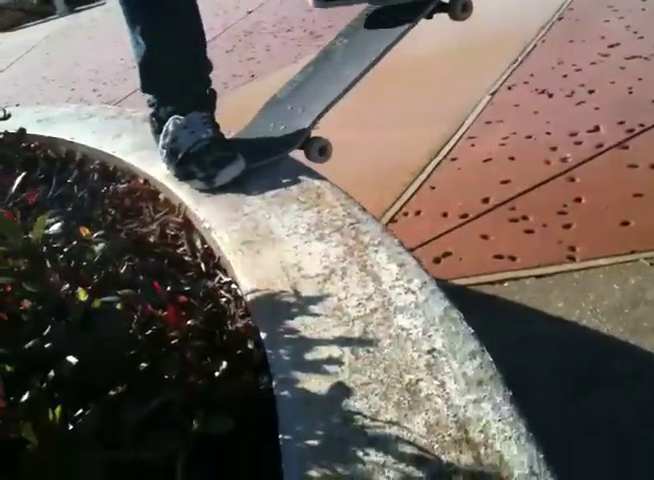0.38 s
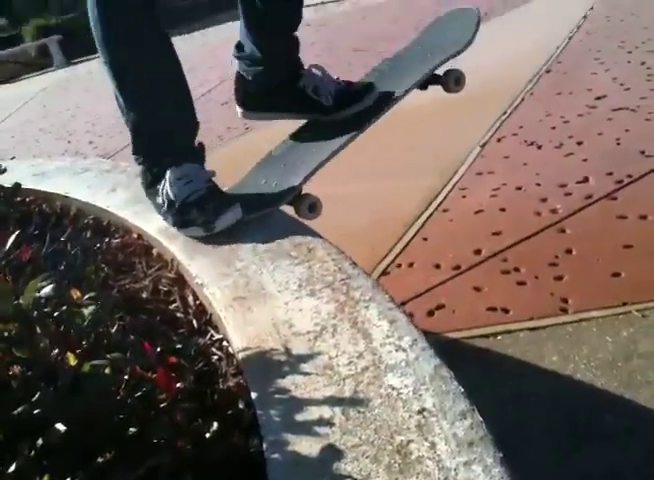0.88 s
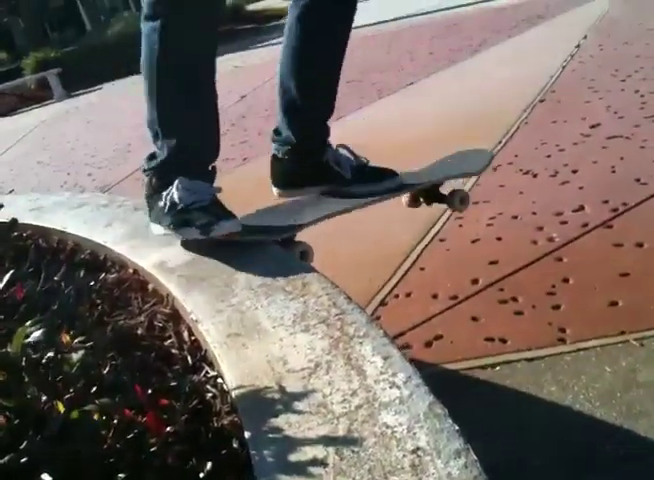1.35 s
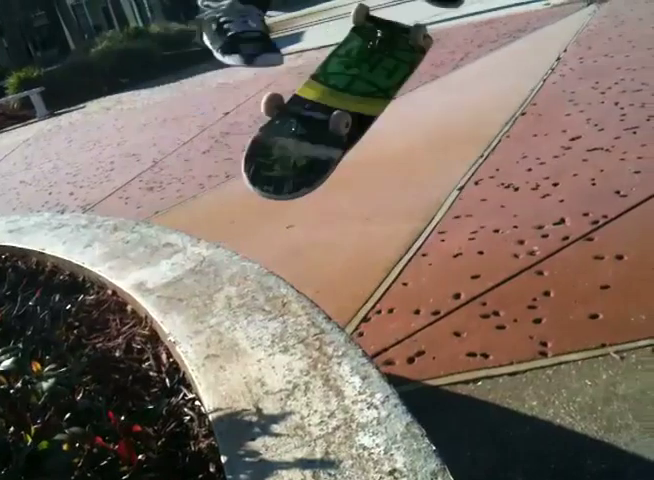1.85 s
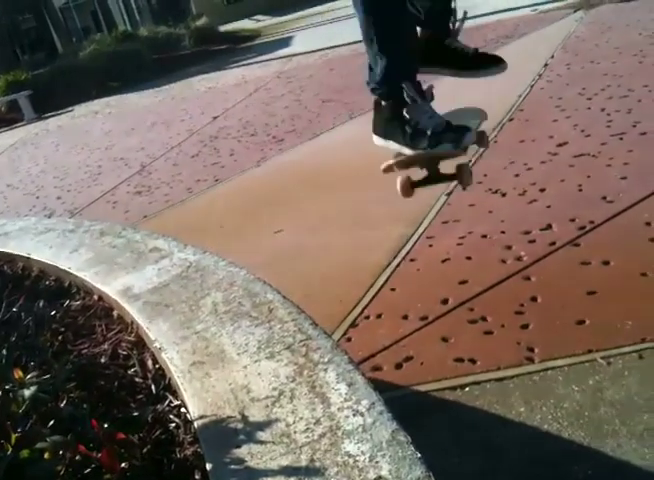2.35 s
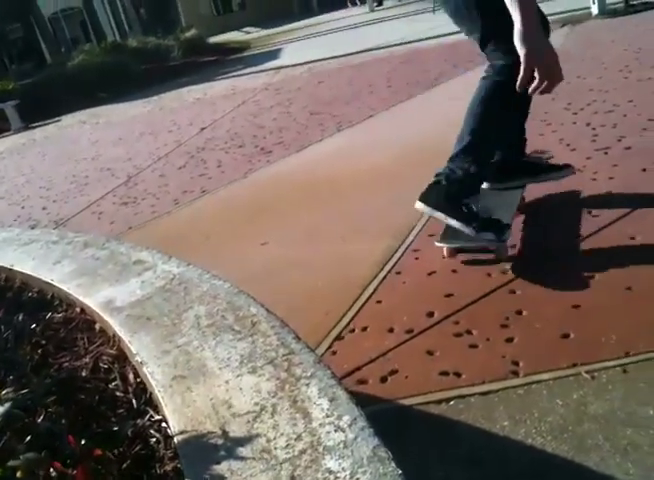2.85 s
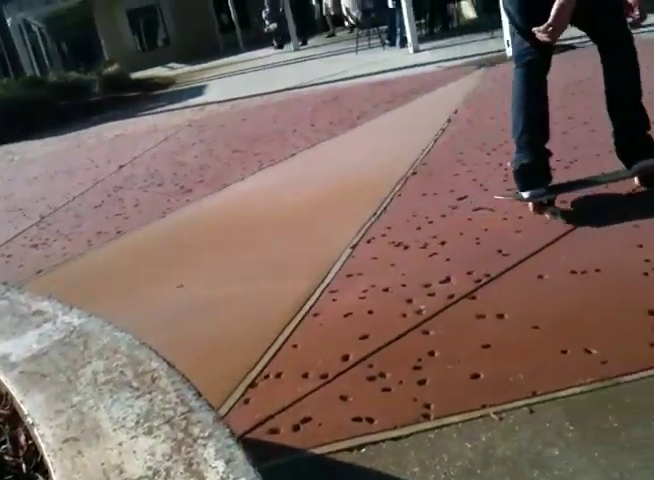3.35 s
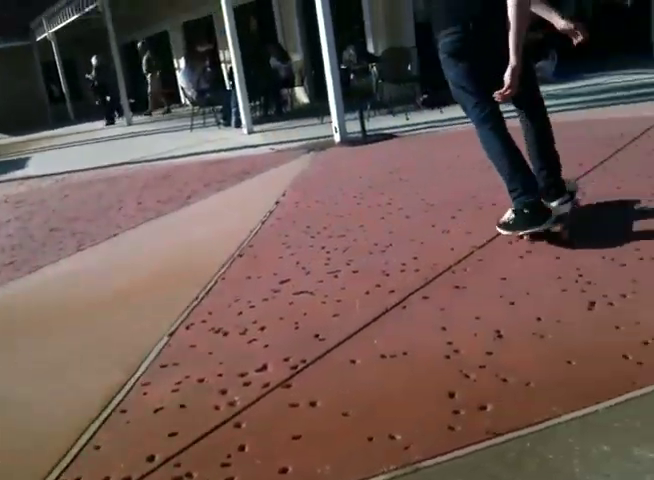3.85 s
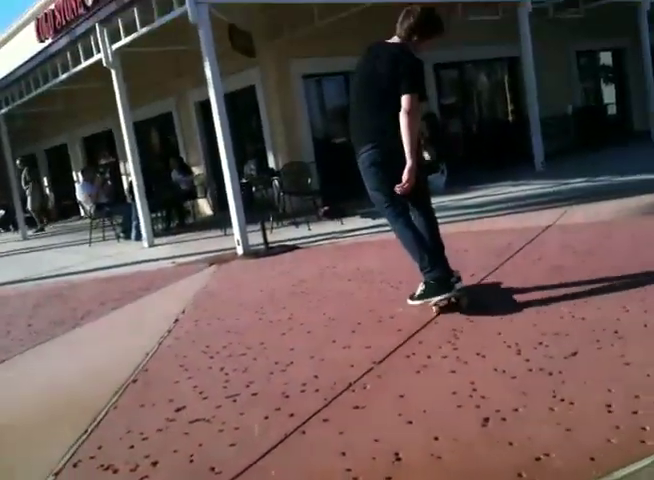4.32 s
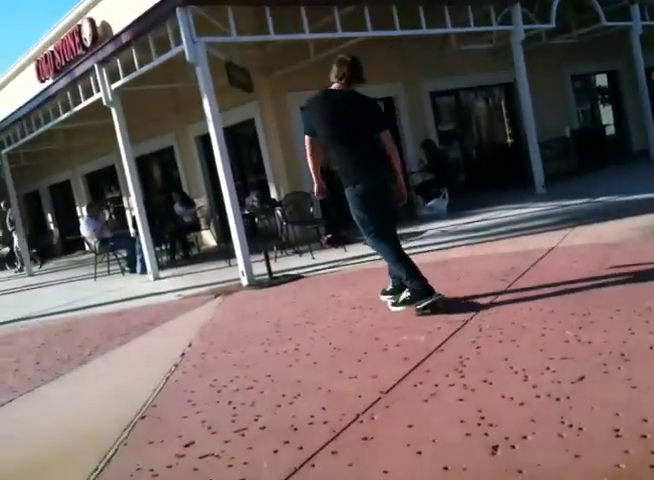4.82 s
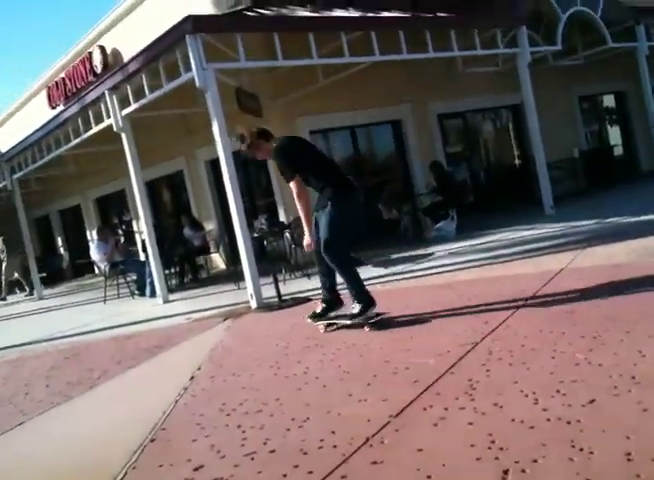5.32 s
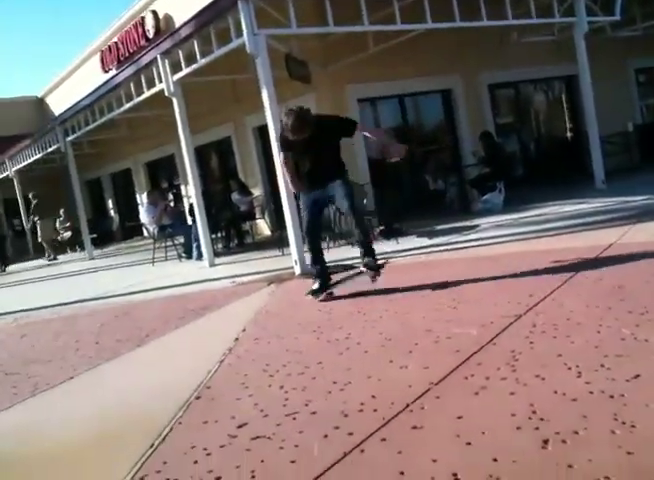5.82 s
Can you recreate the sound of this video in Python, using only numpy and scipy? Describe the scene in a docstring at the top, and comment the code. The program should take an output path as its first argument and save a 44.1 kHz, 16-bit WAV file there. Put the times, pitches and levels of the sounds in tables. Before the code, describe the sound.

A skateboard tail smacks a concrete kerb, followed by faint shoe and grit shuffles. The pop and flip play at half speed, low, dull and scraping, with quiet flight. A very loud double landing overloads the small phone microphone, then a quick clattering burst follows. Wheels tick and rumble away across an open plaza while gusts thump the microphone.

```python
"""Open paved plaza with a concrete kerb: a skateboard tail is stamped, popped into a flip, landed hard, rolled away.
Blows and scrapes drive deck, truck and tape resonators and coloured noise; a noise tail echoes them.
Noise through the deck modes rumbles, faintly in flight; grit hisses on the ground; wheels clack over joints.
Wind is lumpy filtered noise plus short decaying sines. A small phone microphone overloads on the landing.
The flight plays at half speed, an octave lower."""
import sys
import numpy as np
from scipy import signal
from scipy.fft import rfft, irfft
from scipy.io import wavfile
from scipy.ndimage import uniform_filter1d

SR = 44100
rng = np.random.default_rng(int(sys.argv[2]) if len(sys.argv) > 2 else 0)


def ratio(d):
    """dB to gain"""
    e = np.asarray(d, float) / 20
    return 10 ** e


def log_audio(samples):
    """Write samples as a 16-bit WAV file to the path given in sys.argv[1]."""
    # one column per channel
    frames = np.atleast_2d(samples).T
    # limit to full scale, then quantise
    limited = np.clip(frames, -1, 1)
    pcm = np.round(limited * 32767).astype(np.int16)
    wavfile.write(sys.argv[1], SR, pcm)


N = 261954

# All t/s are as played, slow part included. Levels are nominal, ahead of the microphone.
# far plaza noise with microphone hiss: f/Hz, relative density/dB
PLAZA_SPECTRUM = [(30, -14.5), (120, 12), (400, -18), (1160, -11.5), (2230, -23.5), (3310, -20),
                  (4780, -25), (6720, -26.5), (15000, -44)]
# breeze at the microphone port between gusts: t/s, level/dB
BREEZE_LEVEL = [(0, -55.5), (1.6, -53), (2.3, -57.5), (2.8, -46.5), (3.4, -33), (3.9, -41.5), (4.5, -47),
                (5.1, -49), (5.94, -56)]
# gusts: peak t/s, rise/s, fall/s, level/dB; rise and fall each span GUST_SPAN_DB, 0.01 s at least
WIND_GUSTS = [(.036, .025, 0.066, -39), (.17, 0.12, 0.097, -44), (.356, 0.05, 0.014, -42.5),
              (.416, 0.023, .09, -43), (.616, 0.05, 0.058, -33), (.836, 0.14, 0.023, -41.5),
              (.96, 0.073, 0.046, -37.5), (1.046, 0.046, .05, -46), (1.266, 0.14, 0.3, -40.5),
              (1.468, 0.089, .04, -42.5), (1.574, .1, 0.054, -40), (2.032, .07, .03, -50),
              (2.13, .025, 0.017, -46), (2.729, .09, 0.11, -35), (2.971, 0.15, 0.17, -23.5),
              (3.3, 0.25, 0.058, -22), (3.492, 0.11, 0.36, -20), (3.62, .1, 0.063, -19.5),
              (3.74, .07, 0.049, -22), (3.819, .03, 0.028, -20.5), (3.99, .15, 0.43, -33),
              (4.16, 0.03, 0.034, -29), (4.25, 0.11, .12, -21), (4.35, 0.072, 0.25, -24.5),
              (4.64, 0.063, 0.075, -30.5), (4.85, 0.27, .05, -43), (5.19, 0.028, 0.091, -37.5),
              (5.308, 0.048, 0.018, -35), (5.43, 0.066, 0.1, -34.5), (5.57, 0.12, 0.19, -30),
              (5.811, 0.17, 0.019, -38), (5.871, 0.014, 0.086, -37.5)]
# single buffets of wind: t/s, level/dB, settled pitch f/Hz
WIND_BUFFETS = [(0.605, -20, 178), (1.036, -32, 156), (2.866, -22, 166), (2.931, -18, 243),
                (2.961, -17.5, 214), (3.019, -16, 167), (3.254, -15.5, 224), (3.288, -20, 364),
                (3.464, -12.5, 228), (3.508, -9.5, 191), (3.557, -10, 255), (3.625, -18, 161),
                (3.672, -16.5, 354), (3.738, -28, 212), (3.821, -9, 235), (3.995, -24, 260),
                (4.147, -23, 205), (4.244, -18, 184), (4.266, -19, 230), (4.864, -20.5, 174),
                (5.194, -28, 240), (5.536, -25, 190), (5.566, -19, 160), (5.611, -24.5, 198),
                (5.81, -28.5, 169), (5.862, -32, 181)]
# level of the low rumble, faint during the flight: t/s, level/dB
RUMBLE_LEVEL = [(0, -38.5), (.11, -66), (.28, -55.5), (1.45, -57.5), (1.69, -52), (1.9, -57), (2.4, -59),
                (2.58, -41), (2.73, -27), (2.88, -52), (3.2, -47), (3.6, -51.5), (3.8, -39.5), (4.0, -50.5),
                (4.57, -46), (5.03, -52.5), (5.4, -44.5), (5.66, -54.5), (5.94, -57.5)]
# grit and crack: f/Hz, relative density/dB
GRIT_SPECTRUM = [(500, 1), (1500, -1), (2300, 2.5), (3600, 1.5), (5200, -7), (7500, -4), (9000, -8),
                 (15000, -19)]
# plywood deck and axles, low modes: f/Hz, width/Hz, level/dB
DECK_LOW_MODES = [(667, 117, 1), (1071, 170, -0.5), (1320, 81, -4)]
# plywood deck and axles, high modes: f/Hz, width/Hz, level/dB
DECK_HIGH_MODES = [(1538, 386, 0.61), (1850, 330, 1.2), (2170, 116, -1.2)]
# deepest deck modes: f/Hz, width/Hz, level/dB
DECK_THUD_MODES = [(239, 140, -4.5), (516.5, 64, -3)]
# metal trucks and their bolts: f/Hz, width/Hz, level/dB
TRUCK_MODES = [(3306, 122, -10), (3400, 110, 10.5), (4160, 130, -8), (4610, 110, 5.5), (6390, 190, -5),
               (7850, 210, 4)]
# grip tape resonances: f/Hz, width/Hz, level/dB
TAPE_MODES = [(1930, 430, -18), (2780, 220, 7), (3510, 350, -4.5), (4900, 340, -3), (7000, 420, -8)]
# tail and shoes dragged over deck and kerb: start t/s, length/s, deck level/dB, rasp level/dB, grit level/dB
DRAGS = [(0.529, 0.033, -58, -60, -44), (0.722, 0.073, -49, -64, -52.5), (0.819, .03, -53, -58, -43.5),
         (0.956, .12, -63, -62, -57), (1.648, 0.033, -34.5, -31, -34), (1.684, 0.06, -37, -34, -54),
         (1.741, 0.024, -40, -34, -57), (1.763, 0.019, -33, -32.5, -53), (1.788, 0.024, -43, -32.5, -58),
         (1.81, .022, -37.5, -29, -55.5), (1.839, 0.034, -46, -55, -56), (2.403, 0.016, -30, -28, -60),
         (2.443, 0.028, -38, -45, -45), (2.474, .02, -35.5, -48, -54), (2.501, 0.041, -41, -48, -51),
         (3.774, 0.028, -36, -51, -37)]
# lighter knocks: wheels over joints and pits, shoes shifting; the one at 3.652 s is a soft low flutter of wind:
# t/s, level/dB, low modes/dB, crack/dB, rattle/ms
LIGHT_KNOCKS = [(0.773, -36, 1, -3, 15), (1.473, -38.5, -6, -6, 19), (1.5307, -27, 0.5, -1.5, 3.3),
                (1.5653, -30, -9, -13, 9.1), (2.8051, -23.5, -4, -7, 8.3), (2.838, -23, -8.5, -5, 16),
                (2.8978, -29.5, 5.5, -3.5, 2.5), (3.0899, -35.5, -6, 14, 10), (3.328, -34, -20, -19, 9.8),
                (3.4925, -33, -2, 5, 7.5), (3.555, -34.5, 3, -4, 1), (3.652, -44.5, 13.5, -5, 1.6),
                (3.706, -32.5, -3, 0, 4), (3.738, -30.5, -12, -4, 4), (3.8014, -24.5, -3, 4.5, 1),
                (3.8446, -25, -7, -6.5, 2), (3.933, -13, -14, -7.5, 2), (3.9861, -28, -3.5, -4.5, 1),
                (4.0351, -24, -2.5, -8, 4.9), (4.1015, -36.5, 3, 4.5, 1.9), (4.321, -37, -14, -8, 5.1),
                (4.393, -30.5, 2, 3, 9.1), (4.512, -37, 0.5, 3.5, 14), (4.6046, -28.5, 1.5, 1, 7),
                (4.6183, -22.5, 0.5, -0.5, 1), (4.6606, -28, -6, -4, 1.8), (5.0092, -35, 1, 6, 9.9),
                (5.0888, -30.5, -9.5, -1.5, 12), (5.1385, -32.5, 4.5, 9.5, 0.87),
                (5.2551, -26.5, -8.5, -7, 11), (5.405, -32, -3, 1, 5.5), (5.434, -33, -2.5, 3, 26)]
# the whole board struck: t/s, level/dB, low deck/dB, crack/dB, rattle/ms
BOARD_SLAMS = [(0.0772, -10.5, 3, 10, 2.43), (0.094, -28, -2, 6, 34.7), (1.687, -33, 5, -14, 9),
               (2.4074, -28, 2.5, -17, 18.3), (2.57, -1, -1.5, 0, 10.5), (2.5885, -8, 3.5, -9, 5.7),
               (2.6103, 1, -1.5, -7.5, 10.2), (3.0668, -17, -3, 5.5, 11.4), (3.1026, -14, -11, 4, 4.8),
               (3.113, -16, -8, -1.5, 10), (3.1268, -16, -7, 0, 5.9), (3.144, -19, -10, -1.5, 11.5)]

SLOW_FROM_S, SLOW_TO_S = 1.690, 2.521
AIRBORNE_FROM_S, AIRBORNE_TO_S = 1.86, 2.41  # wheels spin free of grit
PLAZA_DB = -48
ECHO_DB, ECHO_T60_S = -23, 0.77
GUST_SPAN_DB = 18
FLUTTER_AT_MINUS_30_DB, FLUTTER_DB_PER_WIND_DB, FLUTTER_WANDER_DB = -40, 1.2943, 1.5
PORT_HZ, PORT_Q = 205, 0.93
BUFFET_T60_S = 0.023
GRIT_AT_MINUS_50_DB, GRIT_DB_PER_RUMBLE_DB = -54, 0.41
SCRAPE_ATTACK_S, SCRAPE_SAG_DB, SCRAPE_T60_S = 0.0062, 3.5, 0.059
SLAM_T60_S, KNOCK_T60_S, BLOW_ATTACK_S = 0.038, 0.043, 0.0016
THUD_RE_LOW_DB, TRUCKS_RE_CRACK_DB = -3, -8


def heard_at():
    """Playback second of every real-time sample."""
    t = np.arange(N) / SR
    return t + np.clip(t - SLOW_FROM_S, 0, (SLOW_TO_S - SLOW_FROM_S) / 2)


def level(x, db):
    """Scale to an rms level."""
    return x * ratio(db) / np.sqrt(np.mean(x ** 2))


def curve(table):
    """Interpolate a two-column table to every sample."""
    s, db = np.transpose(table)
    return np.interp(heard_at(), s, db)


def colour(x, table):
    """Shape a spectrum, keeping white noise at its level."""
    hz, db = np.transpose(table)
    bins_hz = np.fft.rfftfreq(N, 1 / SR)
    gain = ratio(np.interp(np.log(bins_hz + 1), np.log(hz), db))
    return irfft(rfft(x) * gain / np.sqrt(np.mean(gain ** 2)), N)


def ring(x, modes):
    """Parallel resonators of alternating sign, keeping white noise at its level."""
    total, power = 0, 0
    for k, (hz, width_hz, db) in enumerate(modes):
        b, a = signal.iirpeak(hz, hz / width_hz, fs=SR)
        total = total + ratio(db) * (-1) ** k * signal.lfilter(b, a, x)
        power += ratio(db) ** 2 * np.pi * width_hz / SR
    return total / np.sqrt(power)


def walk(rate_hz):
    """Random levels held 1 / rate_hz and slewed twice; spread near 1."""
    k = int(SR / rate_hz)
    held = np.repeat(rng.standard_normal(N // k + 1), k)
    return 1.2 * uniform_filter1d(uniform_filter1d(held, k), k)[:N]


def grains(spread_db):
    """Dense contacts, a few much larger than the rest."""
    return level(rng.standard_normal(N) * ratio(spread_db * rng.exponential(size=N)), 0)


def plaza():
    """Steady far noise that breathes a little."""
    return level(colour(rng.standard_normal(N), PLAZA_SPECTRUM), PLAZA_DB) * ratio(walk(2.5))


def echo(x):
    """Kerb, ground and shop fronts return a short, duller tail."""
    t = np.arange(SR // 2) / SR
    tail = rng.standard_normal(len(t)) * ratio(-60 * t / ECHO_T60_S) * (t > .006)
    tail = signal.lfilter([1], [1, -.6], tail)
    return ratio(ECHO_DB) * signal.fftconvolve(x, tail / np.sqrt(np.sum(tail ** 2)))[:N]


def wind_db():
    """Breeze power plus every gust swelling and dying back."""
    power, t = ratio(curve(BREEZE_LEVEL)) ** 2, heard_at()
    for s, rise_s, fall_s, db in WIND_GUSTS:
        since = t - s
        spans = np.where(since < 0, -since / max(rise_s, .01), since / max(fall_s, .01))
        power = power + ratio(db - GUST_SPAN_DB * spans) ** 2
    return 10 * np.log10(power)


def wind():
    """Eddies push on the resonant port in lumps and flutter above it; buffets are short falling tones."""
    gust_db = wind_db()
    flutter_db = FLUTTER_AT_MINUS_30_DB + FLUTTER_DB_PER_WIND_DB * (gust_db + 30)
    flutter_db = flutter_db + FLUTTER_WANDER_DB * walk(14)
    eddies = ratio(3.26 * walk(70)) * rng.standard_normal(N)
    b, a = signal.iirpeak(PORT_HZ, PORT_Q, fs=SR)
    body = eddies
    for _ in range(3):
        body = signal.lfilter(b, a, body)
    flutter = signal.sosfilt(signal.butter(2, [250, 480], "band", fs=SR, output="sos"), eddies)
    out = ratio(gust_db) * level(body, 0) + ratio(flutter_db) * level(flutter, 0)
    t = np.arange(SR // 16) / SR
    for s, db, hz in WIND_BUFFETS:
        start = np.searchsorted(heard_at(), s)
        swing = np.sin(2 * np.pi * hz * t * (1 + 0.29 * np.exp(-t / 0.0034)))
        envelope = ratio(db + 7.5 - 60 * t / BUFFET_T60_S) * (1 - np.exp(-t / 0.00071))
        out[start:start + len(t)] += envelope * swing
    return out


def rumble_and_grit():
    """Uneven noise through the deck modes rumbles, faintly in flight; grit hisses on the ground only."""
    rumble_db = curve(RUMBLE_LEVEL)
    grounded = (heard_at() < AIRBORNE_FROM_S) | (heard_at() > AIRBORNE_TO_S)
    unevenness = ratio(2 * walk(40))
    rumble = ring(unevenness * grains(3.0), DECK_LOW_MODES)
    rumble = rumble + ratio(0.5) * ring(unevenness * grains(1.6), DECK_HIGH_MODES)
    grit = colour(ratio(1.2 * walk(60)) * grains(1.5), GRIT_SPECTRUM)
    grit_db = GRIT_AT_MINUS_50_DB + GRIT_DB_PER_RUMBLE_DB * (rumble_db + 50)
    return ratio(rumble_db) * level(rumble, -3.5) + grounded * ratio(grit_db) * level(grit, -0.83)


def scrapes():
    """Grip tape and concrete catch and slip many times a second: deck hums, tape rasps, grit hisses."""
    gain, t = np.zeros((3, N)), heard_at()
    for s, length_s, *db in DRAGS:
        since = t - s
        fade_db = SCRAPE_SAG_DB * np.clip(since / length_s, 0, 1)
        fade_db = fade_db + 60 * np.maximum(since - length_s, 0) / SCRAPE_T60_S
        gain += np.clip(since / SCRAPE_ATTACK_S, 0, 1) * ratio(np.array(db)[:, None] - fade_db)
    deck_gain, rasp_gain, grit_gain = gain
    slip = ratio(3 * walk(120))
    tape = 0
    for hz, width_hz, db in TAPE_MODES:  # each resonance catches at its own moments
        catch = ratio(db + 1.04 * walk(90) - 9.0)
        tape = tape + catch * ring(rasp_gain * slip * grains(0.95), [(hz, width_hz, 0)])
    deck = ring(deck_gain * slip * grains(3.3), DECK_THUD_MODES + DECK_LOW_MODES + DECK_HIGH_MODES)
    grit = colour(grit_gain * slip * grains(1.2), GRIT_SPECTRUM)
    return ratio(4.0) * deck + tape + grit


def blows():
    """Each row is a tick, then a rattle that dies; it drives deck and truck modes and a broad crack."""
    thud, low, high, crack, tick, snap = np.zeros((6, N))
    t = np.arange(SR // 4) / SR
    rows = [(*row, SLAM_T60_S) for row in BOARD_SLAMS] + [(*row, KNOCK_T60_S) for row in LIGHT_KNOCKS]
    for s, db, low_db, crack_db, rattle_ms, t60_s in rows:
        slow = 2 if SLOW_FROM_S < s < SLOW_TO_S else 1
        after = np.maximum(t * slow - max(rattle_ms, 0) / 1000, 0)
        push = ratio(db - 8.5 - 60 * after / max(t60_s, .005))
        push *= np.minimum(t / BLOW_ATTACK_S, 1) * (1 + 2.05 * np.exp(-t / 0.0021))
        start = np.searchsorted(heard_at(), s)
        at = slice(start, start + len(t))
        tick[start] = ratio(db + 8.5)
        snap[start] = ratio(db + crack_db - 0.5)
        high[at] += push
        thud[at] += push * ratio(low_db + THUD_RE_LOW_DB)
        low[at] += push * ratio(low_db)
        crack[at] += push * ratio(crack_db - 8) * (1 + 0.9 * np.exp(-t / 0.014))  # extra crack early on
    rattle = ratio(3.7 * walk(250))  # loose parts chatter within a blow
    thud, low, high, crack = (drive * rattle * grains(1.5) for drive in (thud, low, high, crack))
    board = ring(thud, DECK_THUD_MODES) + ring(low, DECK_LOW_MODES) + ring(high + tick, DECK_HIGH_MODES)
    board = board + colour(crack + snap, GRIT_SPECTRUM)
    board = board + ratio(TRUCKS_RE_CRACK_DB) * ring(crack + snap, TRUCK_MODES)
    # a thin open plank radiates little bass
    return signal.sosfilt(signal.butter(2, 320, "high", fs=SR, output="sos"), board)


def scene():
    """Everything in real time, one microphone."""
    board = blows() + scrapes()
    return (board + echo(board) + rumble_and_grit() + wind() + plaza())[None]


def top_cut(x):
    """Nothing passes above the cut-off."""
    return signal.sosfilt(signal.butter(12, 16640, fs=SR, output="sos"), x)


def record(dry):
    """Phone cuts bass, dips where its case cancels, overloads, cuts the top; flight is stretched to twice its length."""
    x = signal.sosfilt(signal.butter(2, 130, "high", fs=SR, output="sos"), dry)
    x = x - 0.6 * signal.lfilter(*signal.iirpeak(2804, 2.48, fs=SR), x)  # case dip: f/Hz, Q
    x = x / (1 + np.abs(x / 0.7) ** 6) ** (1 / 6)  # saturates towards 0.7
    x = signal.sosfilt(signal.ellip(8, .2, 70, 15600, fs=SR, output="sos"), x)
    start = int(SLOW_FROM_S * SR)
    stop = start + int((SLOW_TO_S - SLOW_FROM_S) * SR / 2)
    stretched = signal.resample_poly(x, 2, 1, axis=1)[:, 2 * start:2 * stop]
    stretched = signal.sosfilt(signal.ellip(8, .2, 70, 7350, fs=SR, output="sos"), stretched)
    x = np.hstack([x[:, :start], stretched, x[:, stop:]])[:, :N]
    return top_cut(x)


dry = scene()
out = record(dry)
log_audio(out)
```